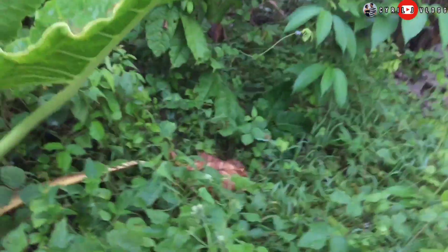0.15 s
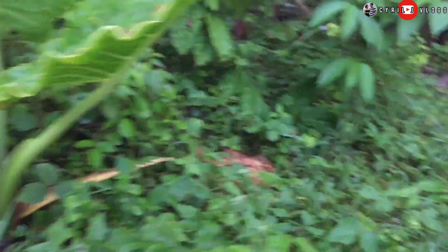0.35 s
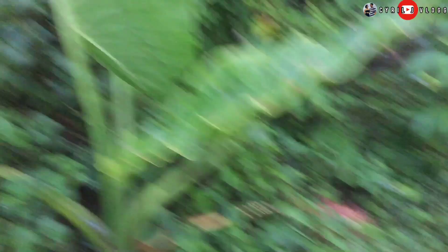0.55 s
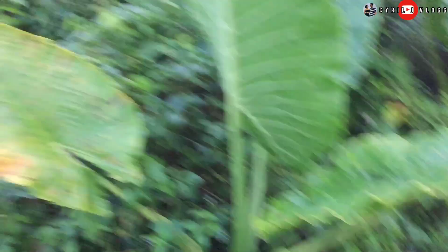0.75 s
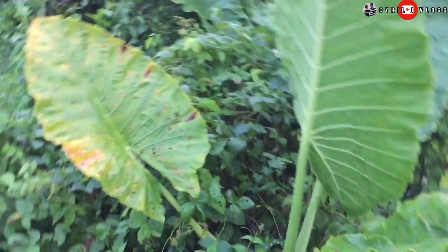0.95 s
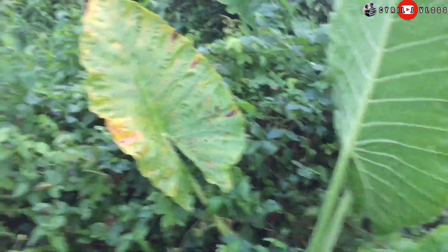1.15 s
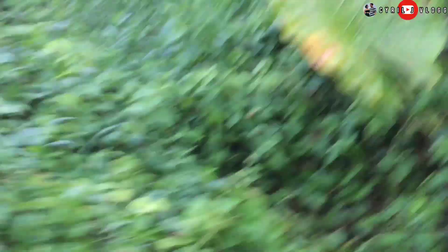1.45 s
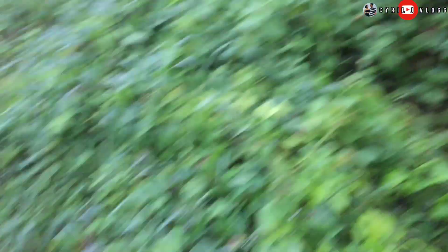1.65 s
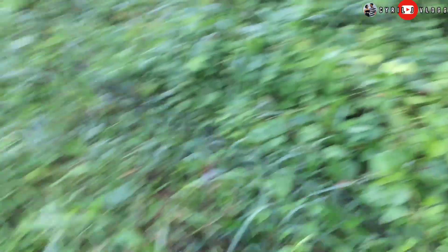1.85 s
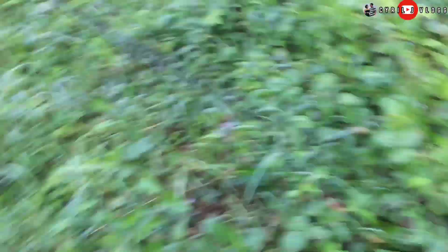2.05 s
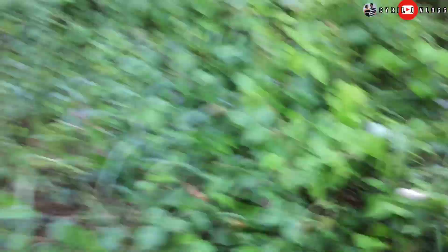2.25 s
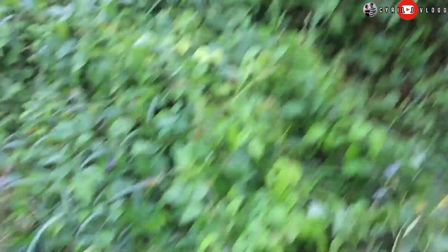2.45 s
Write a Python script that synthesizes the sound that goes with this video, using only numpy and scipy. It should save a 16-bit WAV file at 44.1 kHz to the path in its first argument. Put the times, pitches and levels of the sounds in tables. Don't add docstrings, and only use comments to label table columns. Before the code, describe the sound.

Leaves tick and swish close to a handheld microphone outdoors, with low handling bumps and wind puffs; katydids rasp steadily, far roosters crow with echo, then a stem slaps the microphone loudly near the end.

```python
import sys
import numpy as np
from scipy import signal
from scipy.fft import rfft, irfft
from scipy.io import wavfile
from scipy.ndimage import uniform_filter1d

SR = 44100
rng = np.random.default_rng(int(sys.argv[2]) if len(sys.argv) > 2 else 0)


def elevation(decibels):
    levels = np.asarray(decibels, float)
    return 10 ** (levels / 20)


def put_to_file(sound):
    columns = np.atleast_2d(sound).T
    safe = np.clip(columns, -1, 1)
    whole_steps = np.round(safe * 32767)
    wavfile.write(sys.argv[1], SR, whole_steps.astype(np.int16))


N = 114660


def rms_one(x):
    return x / np.sqrt(np.mean(x ** 2) + 1e-20)


def in_time(rows):
    return np.interp(np.arange(N) / SR, *np.transpose(rows))


def at_hz(points, hz):
    point_hz, point_db = np.array(points).T
    return np.interp(np.log(hz + 1), np.log(point_hz), point_db, left=-90)


def drift(rate):
    r = np.exp(-80 * np.pi * rate / SR)
    draws = rng.standard_normal(N // 40 + 2002)
    slow = signal.lfilter([1], [1, -2 * r, r * r], draws)[2000:]
    return np.interp(np.arange(N) / 40, np.arange(len(slow)), rms_one(slow - slow.mean()))


def colour(x, spectrum):
    gain = elevation(at_hz(spectrum, np.fft.rfftfreq(N, 1 / SR)))
    return rms_one(irfft(rfft(x) * gain, N))


def resonate(x, hz, width):
    r = np.exp(-np.pi * width / SR)
    a = [1, -2 * r * np.cos(2 * np.pi * hz / SR), r * r]
    once = signal.lfilter([1, 0, -1], a, x)
    return rms_one(signal.lfilter([1, 0, -1], a, once))


def gate(start, length, edge):
    t = np.arange(N) / SR - start
    return np.clip(np.minimum(t, length - t) / edge, 0, 1)


def patchy(x, patchy_db):
    octave = np.log2((np.fft.rfftfreq(N, 1 / SR) + 1) / 20)
    spectrum, out = rfft(x), 0
    for k in range(11):
        band = irfft(spectrum * np.clip(1 - abs(octave - k), 0, 1), N)
        out = out + band * elevation(patchy_db * drift(9.7))
    return out


# time in seconds, level in dB.
GUSTS = [(0.0, -58), (0.09, -69.5), (0.38, -64), (0.67, -48.5), (0.73, -68), (1.01, -58), (1.19, -59),
         (1.24, -46), (1.5, -74), (2.13, -60), (2.25, -66), (2.29, -66), (2.42, -72.5), (2.6, -67)]
# frequency in Hz, density in dB per Hz.
PORT_TONE = [(12, -57), (20, -42), (48, 3), (92, 1.5), (208, -13.5), (242, -26), (500, -30.5), (650, -60),
             (1100, -120)]


def wind():
    x = colour(rng.standard_normal(N) * elevation(2.5 * drift(8.5)), PORT_TONE)
    lumps = np.sqrt(uniform_filter1d(x ** 2, size=2500) + 0.16)
    return elevation(in_time(GUSTS)) * x / lumps


# frequency in Hz, density in dB per Hz.
AIR_TONE = [(88, -31), (150, -1), (439, -8), (649, -8), (3770, -21.5), (5150, -4.5), (6020, -39),
            (7900, -28.5), (9260, -25.5), (16000, -29)]


def open_air():
    return elevation(-68.5) * patchy(colour(rng.standard_normal(N), AIR_TONE), patchy_db=1.7)


# pitch in Hz, width in Hz, level in dB, throbs per second.
CHORUSES = [
    (9240, 570, -78.5, 13),
    (6700, 840, -80.5, 68),
    (3280, 1060, -83, 15),
]
# time in seconds, gain in dB.
TURN_SWELL = [(0, -3.3), (1.2, 0.3), (1.6, 2), (2.25, 4.5), (2.6, -2)]


def choruses():
    out = 0
    for hz, width, db, throbs_per_s in CHORUSES:
        level_db = db + (hz > 8000) * in_time(TURN_SWELL) + 1.5 * drift(throbs_per_s)
        out = out + elevation(level_db) * resonate(rng.standard_normal(N), hz, width)
    return out


# time in seconds, level in dB.
STROKES = [(0.0214, -50), (0.0493, -53.5), (0.082, -49), (0.1678, -55), (0.1979, -54), (0.2264, -58),
           (0.2563, -50), (0.2844, -49), (0.3174, -62), (0.378, -54), (0.3985, -53), (0.4294, -53),
           (0.4618, -53.5), (0.4891, -53.5), (0.5187, -53), (0.5524, -53), (0.62, -69), (0.6669, -54),
           (0.6878, -52), (0.9004, -55), (0.9318, -45), (0.9675, -46), (1.0126, -55), (1.1089, -67),
           (1.1394, -52), (1.1727, -46), (1.205, -46.5), (1.2947, -56), (1.3626, -56), (1.4057, -46.5),
           (1.4345, -46.5), (1.5404, -52), (1.6057, -53.5), (1.6412, -48.5), (1.6761, -49), (1.7579, -56),
           (1.8462, -50), (1.8751, -45), (1.9078, -44), (2.0238, -61), (2.055, -54), (2.0817, -51),
           (2.1104, -49), (2.1437, -44.5), (2.1788, -49), (2.2323, -50.5)]
WING_BAND_HZ = (4494, 5413)


def katydids():
    t, near = np.arange(N) / SR, np.zeros(N)
    lead_s, stroke_s = 0.005, 0.01506
    high_hz, low_hz, teeth_per_s = 5320, 4407, 182
    rasp = resonate(rng.standard_normal(N), 280, 410)
    for s, db in STROKES:
        start = s - lead_s
        u = np.clip(t - start, 0, stroke_s)
        phase = 2 * np.pi * (high_hz * u + (low_hz - high_hz) * u ** 2 / (2 * stroke_s))
        teeth = 1 + 0.27 * np.cos(2 * np.pi * teeth_per_s * u)
        near += elevation(db - 7.0) * gate(start, stroke_s, 0.0015) * np.sin(phase + 0.58 * rasp) * teeth
    hiss = elevation(-55 + 1.0 * drift(24)) * rng.standard_normal(N)
    near += 0.47 * np.roll(near, 260) + 0.37 * np.roll(near, 560) + hiss
    return signal.sosfilt(signal.butter(4, WING_BAND_HZ, "band", fs=SR, output="sos"), near)


# time in seconds, level in dB.
CRICKET_LEVEL = [(.4, -98), (.5, -78), (.9, -76), (1.3, -74), (1.8, -71), (2.05, -78), (2.2, -71),
                 (2.6, -76)]


def cricket():
    t = np.arange(N) / SR
    pitch_hz, pulses_per_s = 6497, 52
    pulses = 1 + .7 * np.sin(2 * np.pi * pulses_per_s * t + 0.91 * drift(2.6))
    tone = np.sin(2 * np.pi * pitch_hz * t + 1.3 * drift(27))
    return elevation(in_time(CRICKET_LEVEL)) * rms_one(pulses * tone * elevation(3.3 * drift(12)))


# start in seconds, length in seconds, pitch in Hz, level in dB.
WHISTLES = [(0.019, 0.033, 675, -79.5), (0.201, 0.027, 662, -78), (0.378, 0.032, 665, -79),
            (0.565, 0.016, 696, -80.5), (0.555, 0.049, 3420, -69), (0.605, .035, 3390, -91),
            (1.518, 0.046, 3450, -69.5), (1.847, 0.04, 3930, -73.5), (1.904, 0.022, 3910, -85),
            (1.95, 0.013, 2950, -85), (1.952, 0.016, 2760, -84.5), (2.02, 0.01, 2930, -82),
            (2.035, 0.015, 2800, -79), (0.083, .012, 3050, -88), (2.032, 0.012, 3580, -76.5)]


def frog_and_birds():
    t, out = np.arange(N) / SR, 0
    sag_per_s = 0.4
    for s, length, hz, db in WHISTLES:
        bent_t = t - sag_per_s * (t - s - length / 2) ** 2 / 2
        swell = gate(s - .005, length + 0.009, length / 3.0) ** 2
        out = out + elevation(db + 11.5) * swell * np.sin(2 * np.pi * hz * bent_t)
    return out


# start in seconds, length in seconds, pitch in Hz.
SYLLABLES = [(1.04, 0.097, 463.7), (1.128, 0.077, 478), (1.329, 0.045, 465), (1.359, 0.051, 536),
             (1.418, 0.041, 527), (1.441, 0.039, 458), (1.522, 0.036, 517), (1.546, 0.16, 465),
             (1.585, 0.13, 527), (1.699, 0.24, 470), (1.65, 0.23, 419), (2.105, 0.055, 453),
             (2.146, .12, 433), (2.136, 0.17, 489.7), (2.396, 0.072, 469.4), (2.456, .2, 438.5),
             (1.05, 0.12, 419.5), (1.09, 0.071, 544), (1.34, 0.032, 522), (1.358, 0.093, 533),
             (1.718, .14, 504.3), (2.13, .12, 350)]
HOARSENESS = [.6, .2, .3, .06, .06, .4, .15, .2, .25, .25, .35, .2, .25, .2, .3, .13, .4, .4, .1, .01, .25,
              .3]
# levels of partials 2, 3, 4 and 5 in dB.
PARTIAL_LEVELS = [(-66, -75, -77, -68), (-63, -82, -64, -64.5), (-64.5, -62.5, -69, -63.5),
                  (-53.5, -83, -60, -88), (-47.5, -80, -72, -88), (-64.5, -62, -60, -73),
                  (-58.5, -70, -68, -73), (-68, -71, -58.5, -63), (-56.5, -72, -62, -89),
                  (-71, -75, -60.5, -71), (-66, -79, -68, -70), (-73, -68, -58, -61.5),
                  (-83, -77, -64, -84), (-64.5, -62, -66.5, -79), (-56, -61.5, -54.5, -70),
                  (-59.5, -70, -60.5, -62.5), (-67, -74, -78, -76), (-61, -66.5, -78, -86),
                  (-53, -86, -62, -78), (-80, -86, -53.5, -85), (-56, -76, -63, -74),
                  (-76.5, -85, -67, -63)]


def roosters():
    t, out = np.arange(N) / SR, 0
    sag_per_s, fade_db = 0.11, 3
    fades = [2 * np.tanh(drift(41) / 1.37) for k in range(6)]
    jitter = drift(151.7)
    for n, ((s, length, hz), rough, levels) in enumerate(zip(SYLLABLES, HOARSENESS, PARTIAL_LEVELS)):
        pitch_hz = hz * (1 - sag_per_s * (t - s) + 0.127 * rough * jitter)
        phase = 2 * np.pi * np.cumsum(pitch_hz) / SR
        depth_db = fade_db * (0.88 + 3 * rough)
        voice = 0
        for k, db in enumerate(levels):
            voice = voice + elevation(db + depth_db * fades[(k + n) % 6]) * np.sin((k + 2) * phase)
        out = out + gate(s, length, 0.011) * voice
    return out


def far_calls():
    calls = frog_and_birds() + roosters()
    t = np.arange(SR // 2) / SR
    yard_t60_s, yard_db = 0.54, -11.5
    tail = rms_one(rng.standard_normal(SR // 2) * elevation(-60 * t / yard_t60_s)) / np.sqrt(SR / 2)
    return calls + elevation(yard_db) * signal.fftconvolve(calls, tail)[:N]


# start in seconds, length
# in seconds, pitch in Hz, level in dB.
BODY_BUMPS = [(0.597, .04, 80, -48.5), (0.644, 0.043, 86.5, -50.5), (0.758, 0.031, 60.4, -52.5),
              (0.891, 0.05, 67, -53), (1.005, 0.014, 323, -53.5), (1.013, 0.029, 59.7, -48),
              (1.236, 0.046, 81.4, -49.5), (1.348, 0.055, 81, -53), (1.585, 0.026, 79.5, -57),
              (1.882, 0.03, 75, -64), (2.086, 0.036, 78.6, -59), (2.29, 0.04, 122, -52),
              (2.275, 0.048, 314.4, -41), (2.55, 0.038, 78.3, -62)]


def bumps():
    t, out = np.arange(N) / SR, 0
    for s, length, hz, db in BODY_BUMPS:
        swings = np.sin(2 * np.pi * hz * (t - s))
        out = out + elevation(db + 6.0) * gate(s, length, length / 2) * swings
    return out


# time in seconds, level in dB.
LEAF_RUB = [(.7, -71.5), (.768, -49), (.82, -57), (1.0, -64), (1.035, -64.5), (1.07, -61), (1.12, -65),
            (1.14, -66.5), (1.225, -71), (1.27, -78.5), (1.40, -76), (1.5, -82), (1.6, -67), (1.73, -69),
            (1.82, -85), (2.28, -75), (2.31, -59.5), (2.6, -64)]
# frequency in Hz, density in dB per Hz.
LEAF_TONE = [(120, -46), (200, -16), (334, -6.5), (558, -16), (1210, -5), (1530, -12.5), (5520, -11.5),
             (14300, -19), (17000, -16)]


def leaves():
    grains_per_s, grain_db, clump_db = 1900, -3, 1.5
    sizes = elevation(5.7 * np.minimum(rng.exponential(1, N), 3.0)) * rng.choice([-1, 1], N)
    clicks = rng.random(N) < grains_per_s * elevation(clump_db * drift(30)) / SR
    grains = rms_one(sizes * clicks)
    swish = colour(rng.standard_normal(N) + elevation(grain_db) * grains, LEAF_TONE)
    return elevation(7.5 + in_time(LEAF_RUB)) * patchy(swish, patchy_db=1.7) * gate(0.709, 3, 0.0036)


# start in seconds, level in dB,
# time to die away by 60 dB in seconds, low cut in Hz, high cut in Hz.
CONTACTS = [(.716, -46, 0.012, 2000, 15000), (.7295, -43.5, 0.016, 2500, 9000),
            (.7505, -43, 0.11, 4030, 9000), (.763, -43, 0.1, 595, 19000), (.990, -43, 0.022, 4950, 19000),
            (1.010, -50, .02, 3000, 11000), (1.376, -76, .15, 10000, 19000),
            (1.589, -64, 0.22, 9000, 19000), (.768, -39, .2, 950, 1450), (.8, -45, 0.096, 3000, 10000),
            (2.349, -45, .1, 1500, 7900), (2.056, -68, .04, 9000, 19000), (2.095, -67, .1, 8800, 19000),
            (2.218, -60, 0.012, 9000, 19000), (2.218, -49, .02, 2300, 3520),
            (2.252, -39.5, 0.041, 2770, 11800), (2.265, -34.5, 0.11, 774, 12000),
            (2.269, -41, 0.15, 600, 2180), (2.2748, -20.5, 0.23, 154, 18900),
            (2.2772, -16.5, 0.031, 1490, 11900), (2.285, -25, 0.027, 2120, 4900),
            (2.286, -30.5, 0.45, 157, 19000), (2.308, -33, 0.048, 490, 9400),
            (2.566, -45, 0.033, 2700, 4500)]
# frequency in Hz, density in dB per Hz.
CONTACT_TONE = [(59, -46), (100, -15), (535, -4.5), (800, -10), (1480, -4), (1800, -11.5), (3470, -4),
                (12900, -9.5), (17000, -13.5)]


def slaps():
    t, out = np.arange(N) / SR, 0
    uneven = rng.standard_normal((2, N)) * elevation(2.5 * rng.standard_normal((2, N)))
    noise = patchy(colour(uneven, CONTACT_TONE), patchy_db=-1.5)
    for k, (s, db, t60, low_hz, high_hz) in enumerate(CONTACTS):
        decay = elevation(db - 60 * np.maximum(t - s, 0) / t60)
        burst = noise[k % 2] * decay * gate(s, 1.5, 0.00014)
        band = signal.butter(2, [low_hz, high_hz], "band", fs=SR, output="sos")
        out = out + signal.sosfilt(band, burst + 1e-18)
    return out


def scene():
    background = wind() + open_air() + choruses() + katydids() + cricket() + far_calls()
    return (background + bumps() + leaves() + slaps())[None]


def roll_off(x):
    return signal.sosfilt(signal.butter(12, 15800, fs=SR, output="sos"), x)


def record(dry):
    treble_cut = signal.cheby2(14, 60, 15800 * 1.055, fs=SR, output="sos")
    low_cut = signal.butter(2, 28, "high", fs=SR, output="sos")
    mix = signal.sosfilt(low_cut, signal.sosfilt(treble_cut, dry))
    return roll_off(mix)


dry = scene()
out = record(dry)
put_to_file(out)
```